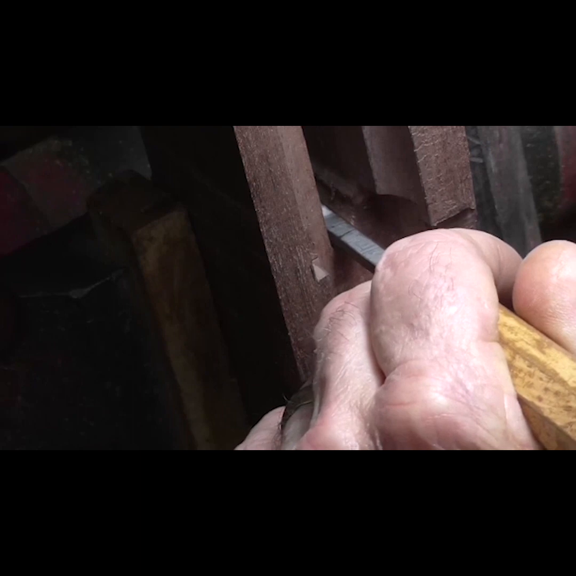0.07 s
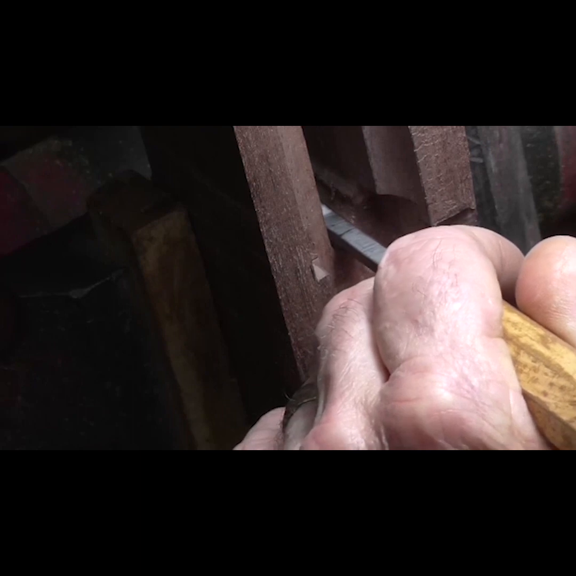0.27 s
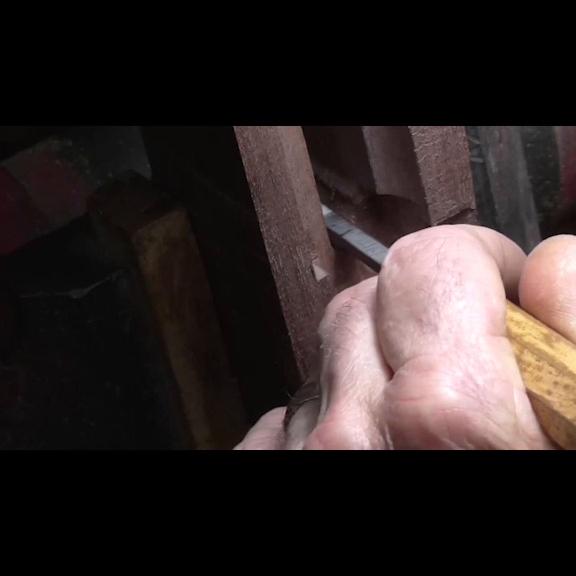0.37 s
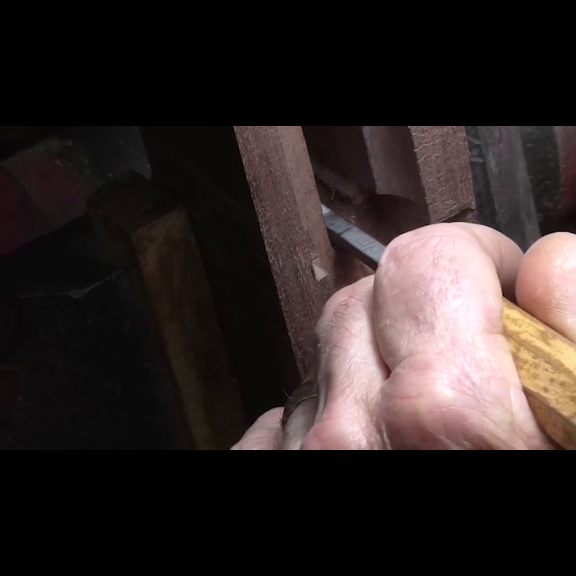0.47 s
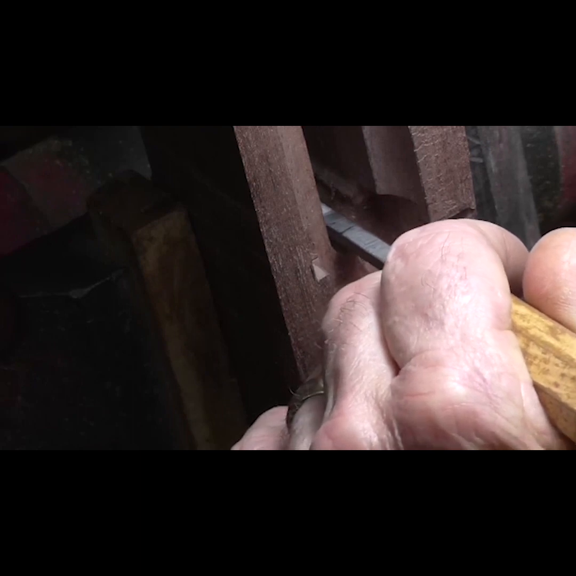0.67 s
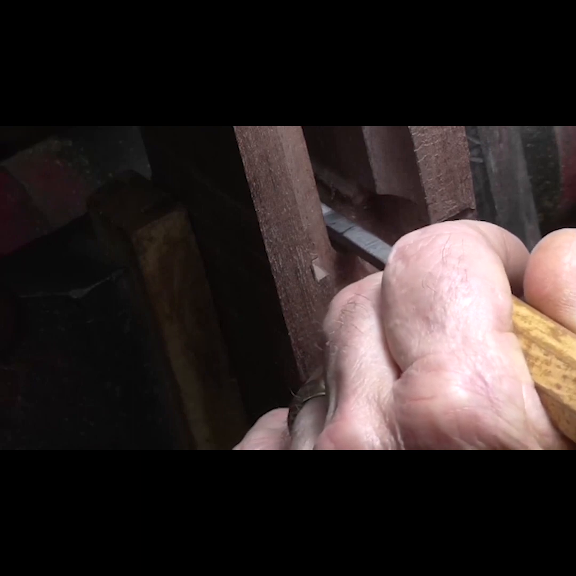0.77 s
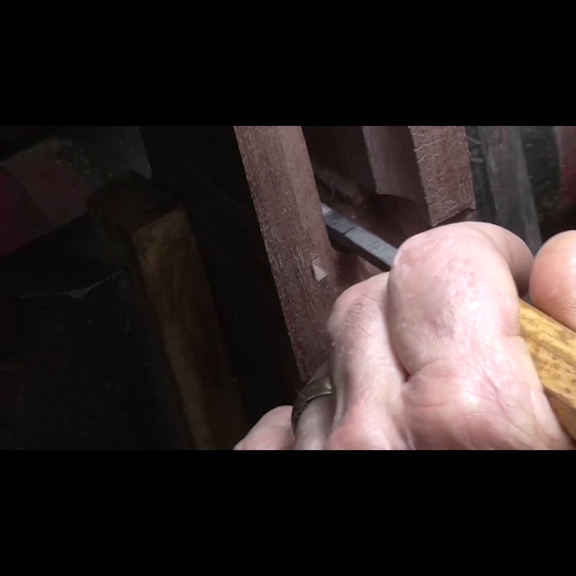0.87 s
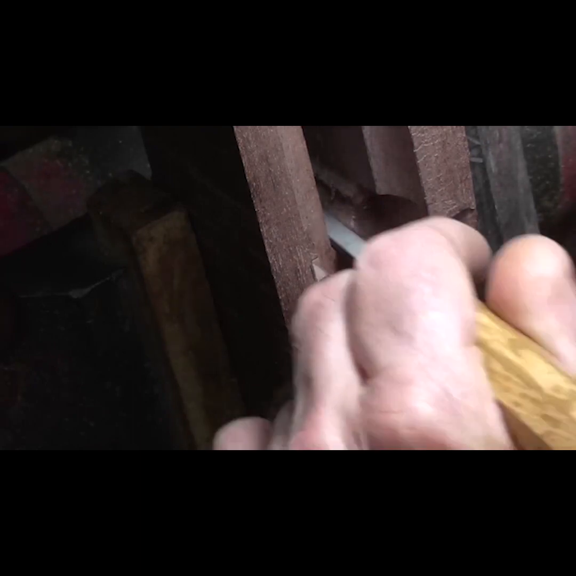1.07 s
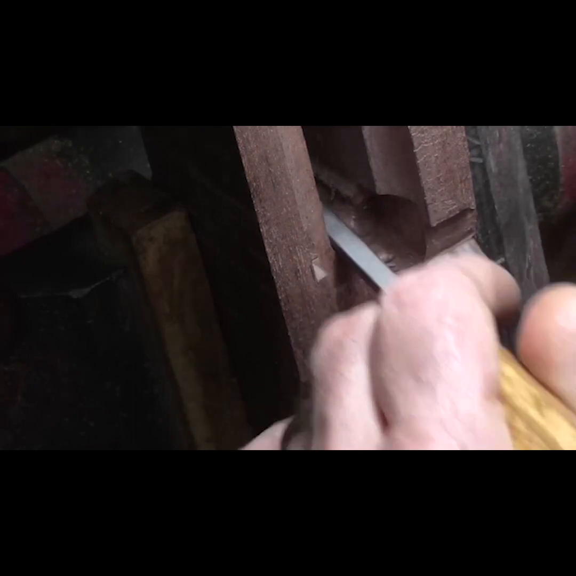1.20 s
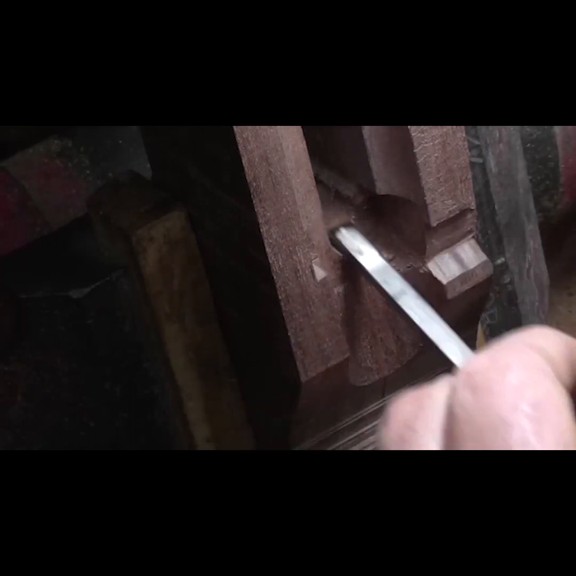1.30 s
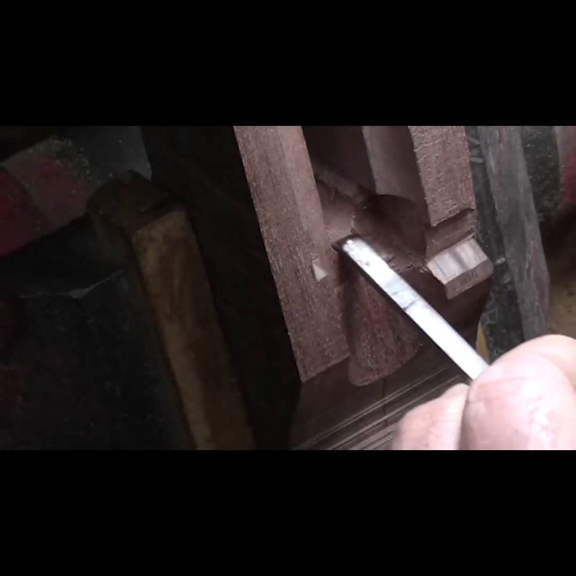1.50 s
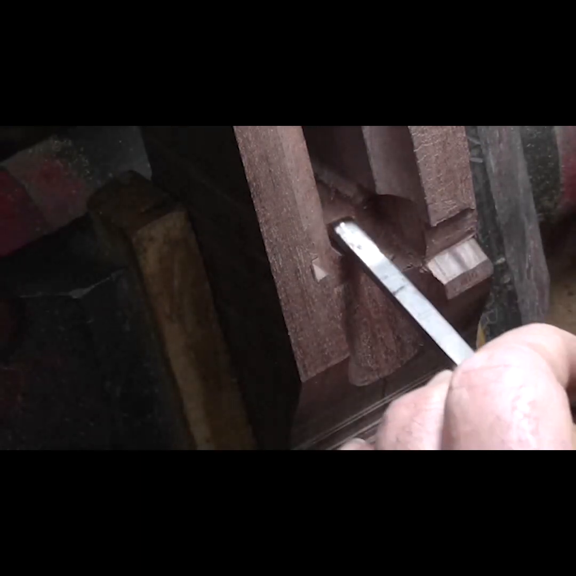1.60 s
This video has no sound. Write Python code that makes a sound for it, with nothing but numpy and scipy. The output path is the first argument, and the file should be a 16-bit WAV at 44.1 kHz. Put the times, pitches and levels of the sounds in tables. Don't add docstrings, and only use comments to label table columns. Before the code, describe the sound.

Mallet knocks a chisel into clamped wood, four even hard blows, then the blade scrapes out softly

```python
import sys
import numpy as np
from scipy import signal
from scipy.fft import rfft, irfft
from scipy.io import wavfile
from scipy.ndimage import uniform_filter1d

SR = 44100
rng = np.random.default_rng(int(sys.argv[2]) if len(sys.argv) > 2 else 0)


def output_pcm(signal):
    pcm = np.clip(np.atleast_2d(signal).T, -1, 1) * 32767
    wavfile.write(sys.argv[1], SR, np.round(pcm).astype(np.int16))


def how_loud(loudness_db):
    steps = np.asarray(loudness_db, float) / 20
    return 10 ** steps


N = 72765
LEAD = 4096


def blow(grain, strength_db, deep_db, crack_db, tilt_db, boom_db):
    # frequency in Hz, level in dB per Hz.
    crack_colour = [(1530, -9), (2600, -18.5), (3090, -16.5), (4700, -6.5), (9000, -11), (11300, -12),
                    (15200, -14), (17000, -53.5)]
    # frequency in Hz, level in dB per Hz.
    crunch_colour = [(1290, 3.5), (2200, -21.5), (2750, -32.5), (4530, -31.5), (10100, -43), (11600, -50),
                     (16000, -49.5)]
    boom_hz = [175, 242, 259]
    # level in dB, t60 in seconds.
    boom_modes = [(-34, 0.28), (-17, 0.25), (-20, 0.28)]
    scatter_db, swell_s = 2.5, 0.0019
    crack_hold_s, crack_t60_s, crack_rise_s = .0022, .011, .0005
    crunch_db, crunch_t60_s = 2, 0.078
    jolt_hz, jolt_db, jolt_t60_s = 103, -30, 0.065
    t = np.arange(SR // 2) / SR
    crack_tilted = [(f, db + tilt_db * np.log2(f / 5000)) for f, db in crack_colour]
    crunch_tilted = [(f, db + 2 * tilt_db * (f > 8000)) for f, db in crunch_colour]

    def fracture():
        crack = coloured(rng.standard_normal(len(t)), crack_tilted)
        crack = crack * how_loud(-60 * np.maximum(t - crack_hold_s, 0) / crack_t60_s)
        crunch = coloured(grit(len(t), 12000, 1.6), crunch_tilted)
        crunch = crunch * how_loud(crunch_db - 60 * t / crunch_t60_s)
        return how_loud(crack_db) * np.minimum(t / crack_rise_s, 1) * (crack + crunch)

    swell = 1 - np.exp(-t / swell_s)
    low = signal.butter(2, jolt_hz, fs=SR, output="sos")

    def jolt():
        rumble = evened(signal.sosfilt(low, rng.standard_normal(len(t))))
        return how_loud(jolt_db - 60 * t / jolt_t60_s) * swell * rumble

    boom = how_loud(boom_db) * swell * ring(boom_hz, boom_modes, t, scatter_db / 2)
    bench = np.array([0 * t, boom + jolt(), 2 * jolt()]).T
    return how_loud(strength_db) * wood(deep_db, scatter_db, grain) + bench + noisy(fracture)


def wood(deep_db, scatter_db, grain):
    knock_hz = [640, 750, 915, 1060, 1143, 1195, 1336, 1428, 1500, 1595, 1770, 1860, 2300, 2345]
    # level in dB, t60 in seconds.
    knock_modes = [(-35, 0.056), (-18.5, 0.098), (-13, 0.04), (-12.5, 0.02), (7.5, 0.05), (-11, 0.13),
                   (-13.5, 0.038), (6.5, 0.027), (1, 0.046), (7.5, 0.025), (11.5, 0.021), (8.5, 0.017),
                   (0.5, 0.068), (-25, 0.12)]
    deep_hz = [345, 425, 480, 564]
    # level in dB, t60 in seconds.
    deep_modes = [(-22, 0.31), (-8, 0.13), (5.5, 0.047), (-24.5, 0.38)]
    sing_hz = [521, 524]
    # level in dB, t60 in seconds.
    sing_modes = [(1, .23), (-13.5, 0.26)]
    # frequency in Hz, level in dB per Hz.
    thud_colour = [(300, 6), (640, -21), (1000, -15), (1500, -10), (1950, -2), (2150, -43), (2700, -42)]
    knock_rise_s, deep_rise_s, sing_rise_s = 0.0005, 0.0019, .004
    thud_db, thud_t60_s, apart_db = -2.5, 0.11, 2
    contact_s, rebound_s, rebound_share = 0.00032, 0.003245, 0.16
    t = np.arange(SR // 2) / SR
    thud = how_loud(thud_db - 60 * t / thud_t60_s) * coloured(grain[0], thud_colour)
    knock = (1 - np.exp(-t / knock_rise_s)) * (ring(knock_hz, knock_modes, t, scatter_db) + thud)
    deep = (1 - np.exp(-t / deep_rise_s)) * ring(deep_hz, deep_modes, t, scatter_db / 2)
    sing = (1 - np.exp(-t / sing_rise_s)) * ring(sing_hz, sing_modes, t, scatter_db / 2)
    deep = how_loud(deep_db) * (deep + sing)
    apart = how_loud(apart_db - 60 * t / thud_t60_s) * np.minimum(t / deep_rise_s, 1)
    apart = apart * coloured(grain[1], thud_colour)

    def push(at_s):
        return np.exp(-((t[:400] - at_s) / (contact_s / 2)) ** 2)

    force = push(contact_s) + rebound_share * push(contact_s + rebound_s)
    force = force / push(contact_s).sum()
    body = signal.fftconvolve([knock, deep, apart], force[None], axes=1)
    return .5 * body[:, :len(t)].T


def rattle():
    # frequency in Hz, level in dB per Hz.
    burst_colour = [(1470, -54), (2500, -6), (4560, -11.5), (5250, -13), (6200, -3.5), (10600, -6),
                    (11700, -1.5), (14800, -16), (16500, -54)]
    steel_hz = [4500, 5870, 6900, 8600, 9500, 11320, 11880, 12630]
    # level in dB, t60 in seconds.
    steel_modes = [(6.5, 0.054), (-9, 0.39), (-20, .15), (-5.5, 0.18), (-11.5, 0.31), (-7, 0.14),
                   (1.5, 0.088), (-14, 0.091)]
    burst_db, burst_t60_s, burst_rise_s, grains_per_s = -32.5, 0.16, 0.00087, 24000
    steel_db, hiss_db, hiss_hz, hiss_peak_s = -34.5, -45, 5460, 0.023
    t = np.arange(SR // 3) / SR
    u = t / hiss_peak_s

    def clatter():
        burst = coloured(grit(len(t), grains_per_s, 2.4), burst_colour)
        burst = burst * np.minimum(t / burst_rise_s, 1) * how_loud(burst_db - 60 * t / burst_t60_s)
        hiss = how_loud(hiss_db) * u * np.exp(1 - u) * band(len(t), hiss_hz, 3000)
        return burst + hiss + how_loud(steel_db) * ring(steel_hz, steel_modes, t, 3.9)

    return noisy(clatter)


def tick(ring_db, hz, wood_db):
    # frequency in Hz, level in dB per Hz.
    click_colour = [(1500, -8), (5000, -3), (7000, -5), (12000, -13.5), (15000, -24)]
    steel_t60_s, click_t60_s, click_gain, rise_s = .028, .018, .9, 0.00008
    t = np.arange(SR // 2) / SR

    def touch():
        steel = sum(np.sin(2 * np.pi * hz * k * t) for k in rng.uniform(.94, 1.06, 3))
        steel = steel * how_loud(-60 * t / steel_t60_s)
        click = click_gain * coloured(rng.standard_normal(len(t)), click_colour)
        click = click * how_loud(-60 * t / click_t60_s)
        return how_loud(ring_db) * np.minimum(t / rise_s, 1) * (steel + click)

    knock = wood(-3.0, 1.5, rng.standard_normal((2, len(t))))
    return noisy(touch) + how_loud(wood_db) * knock


def tap(hz, t60_s, level_db):
    t = np.arange(SR // 4) / SR
    return noisy(lambda: ring([hz], [(level_db, t60_s)], t, 1) * np.minimum(t / .001, 1))


def rub(length_s, hz, width_hz, level_db):
    used = round(length_s * SR)
    stroke = np.sin(np.pi * (np.arange(used) / used) ** 0.68)
    return noisy(lambda: how_loud(level_db) * stroke * evened(band(32768, hz, width_hz)[:used]))


def room(x):
    # frequency in Hz, t60 in seconds.
    decay = [(150, 0.9), (500, 0.46), (1300, 0.41), (2500, 0.34), (6000, 0.26), (12000, 0.13)]
    same = 0.74
    taps = np.zeros((2, SR))
    at = np.arange(200, SR - 20, 20) + rng.integers(0, 20, (2, (SR - 201) // 20))
    np.put_along_axis(taps, at, rng.choice([-1., 1.], at.shape), 1)
    taps[1] = same * taps[0] + np.sqrt(1 - same ** 2) * taps[1]
    hz, t, z = signal.stft(taps, SR, nperseg=256)
    z = z * how_loud(-60 * t / read(decay, hz)[:, None])
    tail = signal.istft(z, SR, nperseg=256)[1]
    return signal.fftconvolve(x[None], tail / np.linalg.norm(tail[0]), axes=1)[:, :len(x)]


def hush():
    # frequency in Hz, level in dB per Hz.
    air_colour = [(24, -59), (40, -33), (124, -3), (438, -8.5), (473, -8), (3210, -8.5), (9240, -36),
                  (14900, -40), (16500, -59)]
    # frequency in Hz, width in Hz, gain in dB.
    port_bumps = [(3118, 4050, -30), (5300, 1630, 8), (8500, 5600, -5.5), (9350, 1280, 8.5)]
    # frequency in Hz, left-right likeness from 0 to 1.
    likeness = [(60, 0.47), (240, 0.96), (950, 0.05), (3770, 0.34), (15000, 0.051)]
    # frequency in Hz, level in dB rms.
    hum_tones = [(123.8, -68.5), (360.7, -61), (479.1, -65), (721.4, -69)]
    air_db, patch_db, hiss_edge_hz = -50, 2.9, 15250
    frames, hz = N // 256 + 5, np.fft.rfftfreq(1024, 1 / SR)
    a, b, c, d, patches = rng.standard_normal((frames, 513, 5)).T
    patches = evened(uniform_filter1d(uniform_filter1d(patches, 10, 0), 10, 1))
    same = read(likeness, hz)[:, None]
    left = a + 1j * b
    z = np.array([left, same * left + np.sqrt(1 - same ** 2) * (c + 1j * d)])
    bumps_db = sum(db * np.exp(-((hz - f) / w) ** 2 * 2) for f, w, db in port_bumps)
    edges = np.minimum(hz / air_colour[0][0], 1) ** 2 / (1 + (hz / hiss_edge_hz) ** 90)
    z *= edges[:, None] * how_loud((read(air_colour, hz) + bumps_db)[:, None] + patch_db * patches)
    air = evened(signal.istft(z, nperseg=1024, noverlap=768)[1][:, :N])
    t = np.arange(N) / SR
    hum = sum(np.sqrt(2) * how_loud(db) * np.sin(2 * np.pi * (f * t + rng.random())) for f, db in hum_tones)
    return how_loud(air_db) * air + hum


def ring(hz, modes, t, scatter_db):
    db, t60_s = np.transpose(modes)[:, :, None]
    luck = rng.standard_normal((2, len(modes), 1))
    drift_hz = np.reshape(hz, (-1, 1)) * (1 + scatter_db / 1500 * luck[1])
    decay = how_loud(db + scatter_db * luck[0] - 60 * t / np.clip(t60_s, .01, .35))
    return -(decay * np.sin(2 * np.pi * drift_hz * t)).sum(0)


def grit(size, per_s, spread_db):
    height = how_loud(spread_db * np.minimum(rng.exponential(1, size), 3.5))
    return height * rng.choice([-1, 1], size) * (rng.random(size) < per_s / SR)


def band(size, hz, width_hz):
    f = np.fft.rfftfreq(size, 1 / SR)
    response = 1 / (1 + 2j * (f - hz) / width_hz) ** 2
    return evened(irfft(rfft(grit(size, 17000, 2.1)) * response, size))


def coloured(x, points):
    hz = np.fft.rfftfreq(len(x), 1 / SR)
    inside = np.clip(hz / points[0][0] - .6, 0, 1) ** 2 * (hz < points[-1][0])
    return evened(irfft(rfft(x) * how_loud(read(points, hz)) * inside, len(x)))


def noisy(make):
    same = 0.69
    common = make()
    return np.array([common, 0 * common, np.sqrt(1 - same ** 2) * make()]).T


def evened(x):
    return x / np.sqrt(np.mean(x ** 2) + 1e-20)


def read(points, hz):
    f, value = np.transpose(points)
    return np.interp(np.log(hz + 1), np.log(f + 1), value)


def add(mix, start_s, sound):
    part = mix[LEAD + round(start_s * SR):][:len(sound)]
    part += sound[:len(part)]


def scene():
    # start in seconds, strength in dB, deep ring in dB, crack in dB,
    # crack brightness in dB per octave, bench boom in dB.
    blow_rows = [
        (-.032, -8, -10.5, -21.5, -15, -13.5),
        (.2230, -4.5, -1.5, -22, -5, -4.5),
        (0.4716, -5.5, -2, -14.5, -1, -7.5),
        (0.7245, -7, 3.5, -20.5, -8, -6),
    ]
    # start in seconds, blade ring in dB, ring in Hz, wood knock in dB.
    tick_rows = [(.638, -49, 5500, -70), (1.0385, -43, 5000, -42), (1.045, -43, 4900, -46),
                 (1.0645, -47, 4500, -38), (1.130, -62, 4500, -52), (1.142, -49, 4800, -52),
                 (1.160, -62, 5000, -54), (1.197, -64, 5000, -58), (1.217, -54, 8400, -55),
                 (1.290, -61, 4700, -58), (1.325, -59, 5000, -60), (1.374, -57, 5400, -54),
                 (1.381, -58, 5400, -53), (1.428, -68, 5000, -55), (1.462, -70, 5000, -58),
                 (1.497, -68, 5000, -57), (1.53, -66, 5300, -58), (1.562, -68, 4800, -56)]
    # start in seconds, mode in Hz, t60 in seconds.
    tap_rows = [(1.0385, 1650, .05), (1.045, 1180, .12), (1.045, 522, .2), (1.046, 2300, .06),
                (1.0645, 1180, .1), (1.0645, 522, .25), (1.0645, 2300, .08), (1.374, 2050, .04),
                (1.379, 2250, .04), (1.380, 1050, .04), (1.04, 760, .05), (1.0645, 690, .05),
                (1.066, 900, .04), (1.131, 800, .04)]
    tap_db = [-43, -37, -42.5, -44, -41, -45, -47.5, -44.5, -45, -44.5, -47, -39.5, -46, -45]
    # start in seconds, length in seconds, resonance in Hz, width in Hz.
    rub_rows = [(1.07, .025, 1180, 70), (1.047, .055, 5200, 3000), (1.138, .042, 1360, 120),
                (1.12, .055, 5200, 2500), (1.195, .045, 9300, 1500), (1.255, .08, 4850, 200),
                (1.298, .06, 1185, 160), (1.265, .07, 2600, 3000), (1.322, .066, 5800, 220),
                (1.372, .04, 1350, 400), (1.03, .6, 3000, 2500), (1.04, .06, 900, 900),
                (1.213, .02, 950, 300), (1.212, .015, 4800, 3000)]
    rub_db = [-50, -61, -51, -65, -66, -60, -57, -61, -66, -56, -70, -52, -57, -61]
    rattle_s = .4962
    left_db, right_db, room_db, deep_room_db = 1, 3, -16, -11
    bench = np.zeros((LEAD + N, 3))
    grain = rng.standard_normal((2, SR // 2))
    for start_s, *how in blow_rows:
        add(bench, start_s, blow(grain, *how))
    add(bench, rattle_s, rattle())
    for start_s, *how in tick_rows:
        add(bench, start_s, tick(*how))
    for start_s, *how in np.column_stack([tap_rows, tap_db]):
        add(bench, start_s, tap(*how))
    for start_s, *how in np.column_stack([rub_rows, rub_db]):
        add(bench, start_s, rub(*how))
    bright, deep, apart = bench.T
    near = (bright + deep) * how_loud([[left_db], [right_db]]) + apart * np.array([[1], [-1]]) / 2
    far = how_loud(room_db) * room(bright + how_loud(deep_room_db) * deep)
    return (near + far)[:, LEAD:] + hush()


def roll_off(x):
    return signal.sosfilt(signal.butter(12, 17160, fs=SR, output="sos"), x)


def record(dry):
    low_cut_hz, edge_hz, ceiling = 69, 16900, .95
    duck_from_db, duck_share, recover_db_per_s = -12.5, .3, 4.5
    low_cut = signal.butter(2, low_cut_hz, "high", fs=SR, output="sos")
    thin = signal.sosfilt(low_cut, dry)
    power = signal.lfilter(np.ones(200) / 200, 1, (thin ** 2).mean(0))
    power_db = 10 * np.log10(abs(power) + 1e-12)
    fall_db = np.arange(N) * recover_db_per_s / SR
    cut_db = duck_share * np.maximum(power_db - duck_from_db, 0)
    thin = thin / how_loud(np.maximum.accumulate(cut_db + fall_db) - fall_db)
    soft = thin / (1 + abs(thin / ceiling) ** 4) ** (1 / 4)
    band_limit = signal.firwin(511, edge_hz, window=("kaiser", 9), fs=SR)
    return roll_off(signal.oaconvolve(soft, band_limit[None], "same"))


dry = scene()
out = record(dry)
output_pcm(out)
```